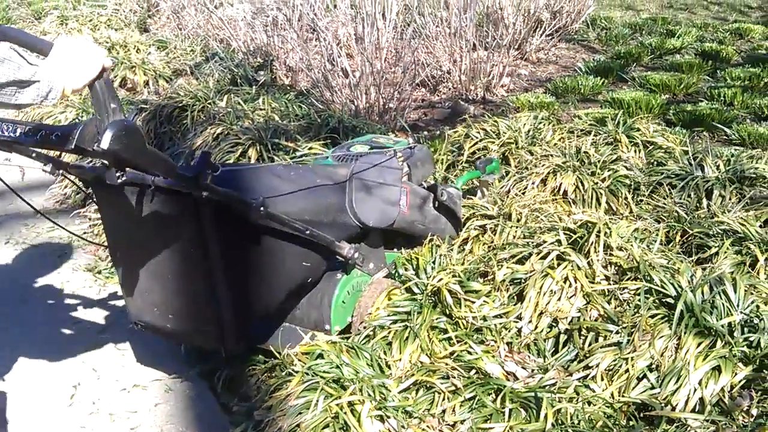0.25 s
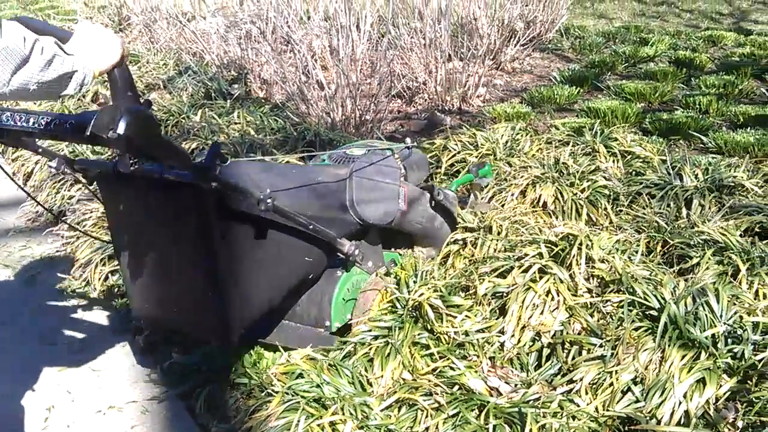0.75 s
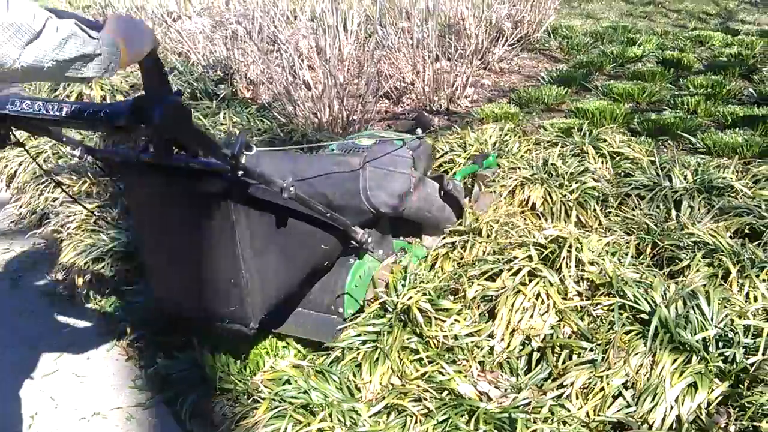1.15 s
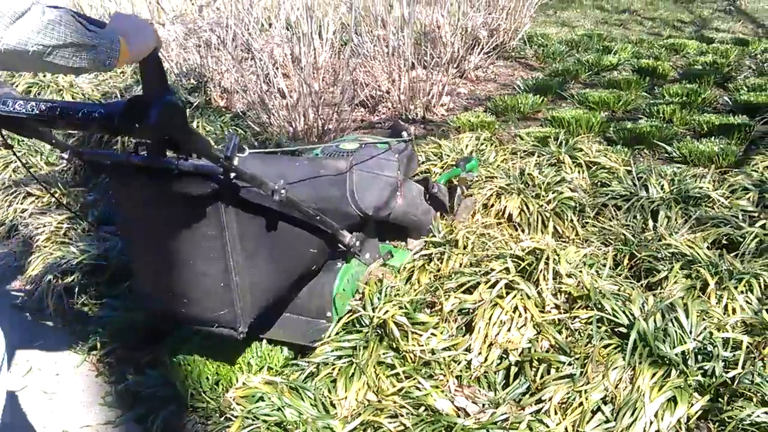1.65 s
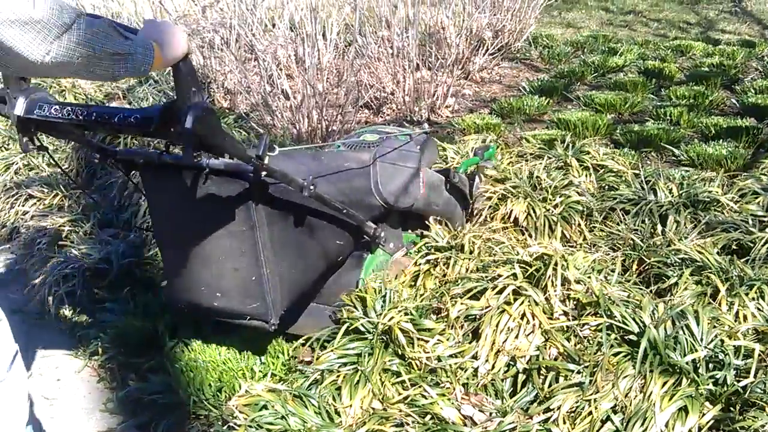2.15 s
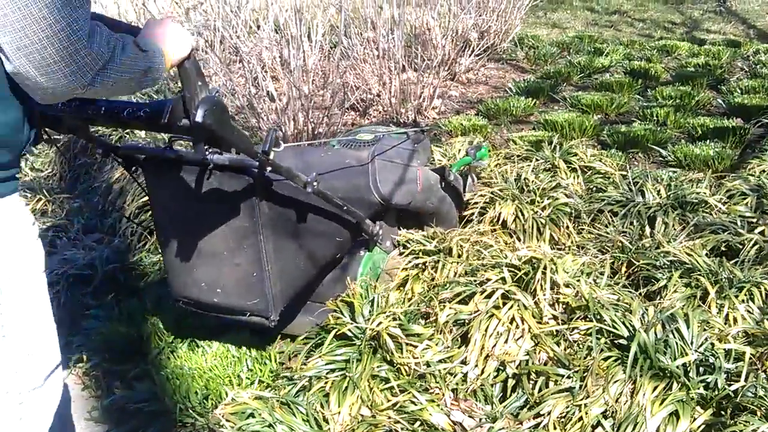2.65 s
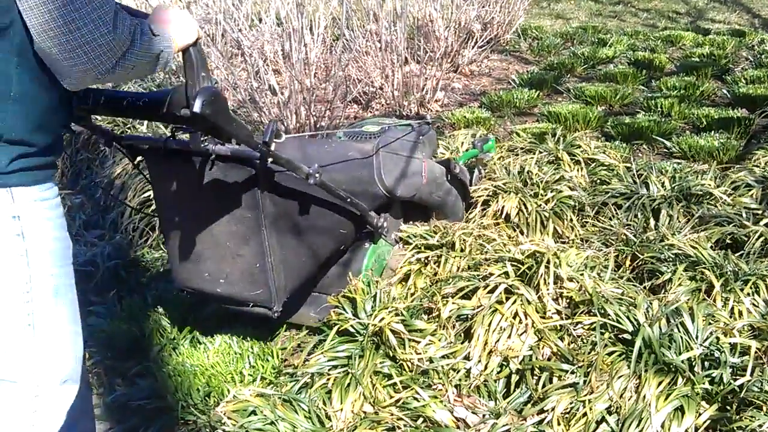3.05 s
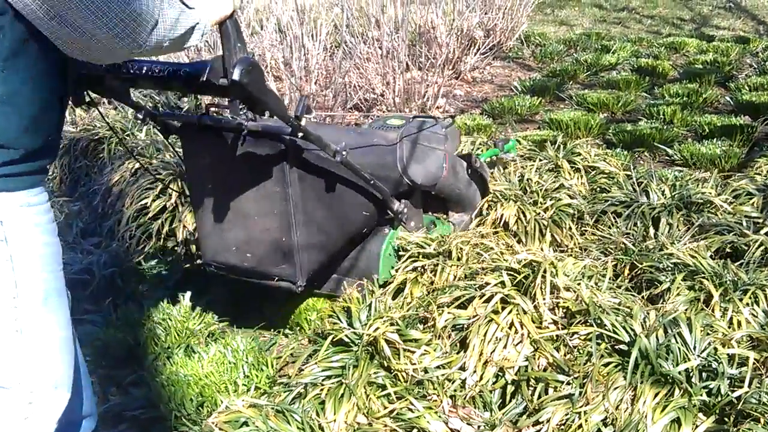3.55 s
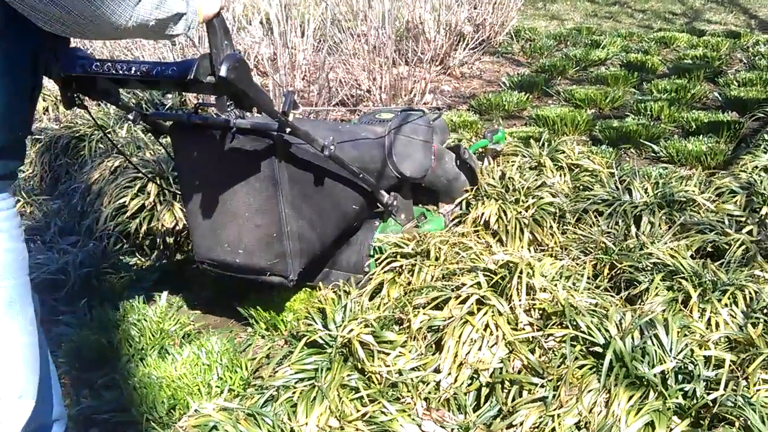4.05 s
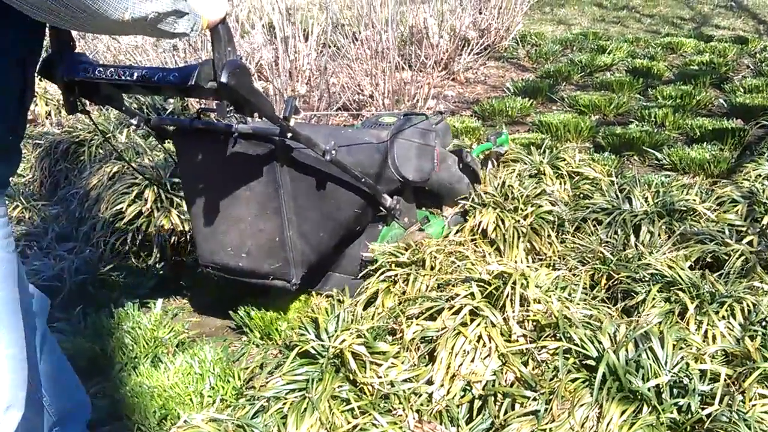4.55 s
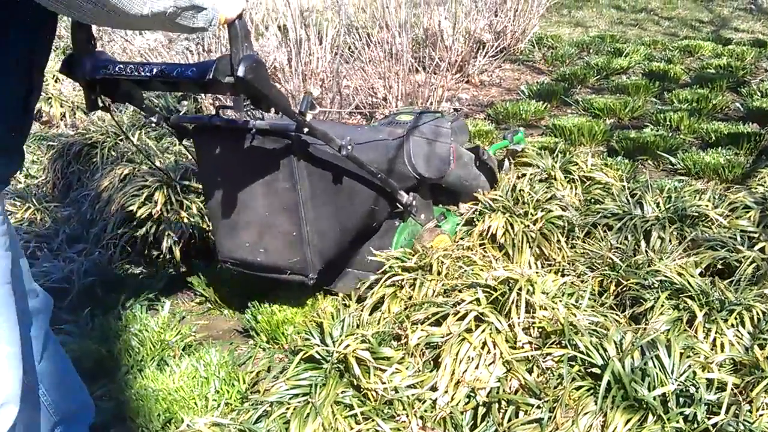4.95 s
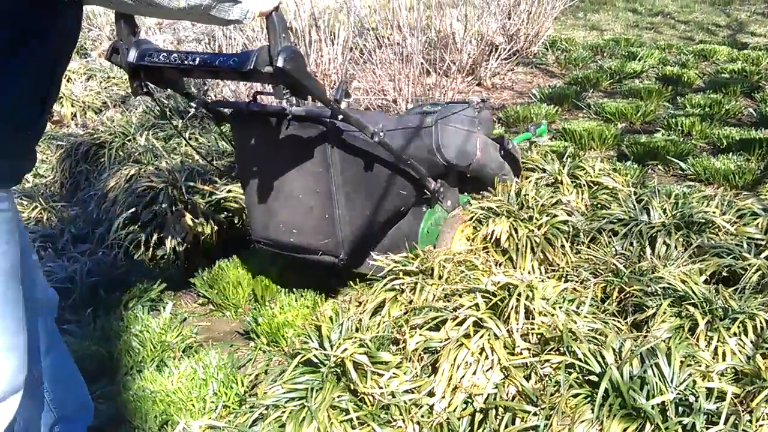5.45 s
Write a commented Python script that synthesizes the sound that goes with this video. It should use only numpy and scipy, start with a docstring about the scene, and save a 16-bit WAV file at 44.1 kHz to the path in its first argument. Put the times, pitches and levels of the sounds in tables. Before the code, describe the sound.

Close petrol mower engine running under load, wavering slightly in pitch as its blade roars and crunches through dense grass.

```python
"""Mowing long grass

A petrol mower is pushed through thick grass nearby. Its two-ended blade drones, drifting a little
in pitch, while the four-stroke engine fires every second turn. Air and clippings roar in the
deck (the steel shell over the blade), leaves shred with a pulsing hiss, and tough stalks snap."""
import sys
import numpy as np
from scipy import signal
from scipy.fft import rfft, irfft
from scipy.io import wavfile

SR = 44100
rng = np.random.default_rng(int(sys.argv[2]) if len(sys.argv) > 2 else 0)


def inscribe(sig):
    """Save sig as 16-bit PCM at rate SR to the path in sys.argv[1].

    A 1-D sig is mono; a 2-D sig holds one channel per row.
    Samples are clipped to [-1, 1] before scaling.
    """
    pcm = np.round(np.clip(np.atleast_2d(sig).T, -1, 1) * 32767)
    wavfile.write(sys.argv[1], SR, pcm.astype(np.int16))


N = 251811
T = np.arange(N) / SR
FREQS = np.maximum(np.arange(N // 2 + 1) * SR / N, 1)

# how often a blade end sweeps past, twice per turn: t/s, f/Hz
BLADE_RATE = [(0.0, 100.2), (0.1, 99.8), (0.19, 101.7), (1.04, 99.8), (1.32, 97.8), (1.52, 100.4),
              (2.07, 101.3), (2.2, 100.0), (2.77, 105.1), (2.96, 105.4), (3.44, 101.3), (3.81, 102.7),
              (4.15, 102.6), (4.45, 104.0), (4.69, 102.5), (5.19, 103.1), (5.5, 98.0), (5.7, 101.0)]
# the drone's main tones, at 2 and 3 times the blade rate: t/s, second level/dB, third level/dB
DRONE_LEVELS = [(0.0, -35, -46), (0.08, -34.5, -35.7), (0.37, -24, -31.5), (0.53, -24.5, -33),
                (0.74, -33, -38), (0.86, -34.5, -29), (0.96, -42, -31.5), (1.35, -31, -37.5),
                (1.47, -22, -25), (1.91, -23.5, -28.5), (2.1, -32.5, -37), (2.32, -40, -31),
                (2.41, -26, -25.5), (2.5, -42.5, -39.3), (2.6, -29, -26.5), (3.21, -21, -20.5),
                (3.53, -40, -30.5), (4.42, -22, -26.5), (4.95, -24.1, -30.5), (5.1, -21.7, -29),
                (5.25, -38, -40), (5.45, -45, -39), (5.52, -37.5, -42), (5.7, -37.5, -36)]
# how much grass the blade takes in, given as a loudness: t/s, level/dB
GRASS_LOAD = [(0.0, -32), (0.35, -26.5), (0.78, -28), (0.83, -26.5), (1.3, -29), (1.72, -26.5), (2.1, -30),
              (2.36, -29.5), (2.43, -25.5), (2.52, -32), (2.61, -24.6), (3.54, -24), (3.74, -27),
              (4.88, -29), (5.15, -26), (5.25, -31), (5.47, -33.5), (5.59, -29.5), (5.7, -26)]
# how each layer follows the mowing: usual level/dB, then dB per dB of load, second tone, third tone
RING_RULE = (-29.5, 0.83, 0.26, 0.32)
ROAR_RULE = (-28.5, 1.11, 0.05, 0.01)
HISS_RULE = (-30.5, 0.56, -0.07, -0.1147)
RASP_RULE = (-45.5, 1.7, -.5, -0.34)
# big clumps of leaves torn off by the blade: t/s, level/dB
CLUMPS = [(0.278, -23.5), (0.362, -23), (0.535, -25.5), (0.855, -19), (0.985, -26), (1.165, -29),
          (1.225, -30), (1.9, -23), (2.72, -31), (2.785, -20), (2.861, -23.5), (2.95, -23), (3.08, -24),
          (3.268, -20.5), (3.366, -23), (3.44, -22), (3.574, -19), (3.887, -27.5), (4.743, -26),
          (5.019, -23), (5.51, -32), (5.594, -26)]
# stalks hit by the blade: t/s, level/dB, extra level of the knock/dB
STALKS = [(0.155, -14.5, -23), (0.848, -17, 1), (1.181, -9.5, -10), (1.5638, -13, -25), (1.822, -10, -29),
          (1.921, -15, -24), (1.9702, -7, -10), (2.4374, -6.5, -1), (2.7285, -10.5, -0.5),
          (2.8617, -11, -17), (2.914, -11, -6), (3.1854, -10, 0), (3.36, -25, 0), (3.497, -15, 8),
          (5.072, -8, -20)]
# weaker tones of blade (whole numbers) and exhaust (quarters): multiple of blade rate, level/dB
OVERTONES = [(1, -29), (1.25, -32), (1.5, -33), (1.75, -25.5), (2.25, -33), (2.5, -33.5), (3.25, -24),
             (3.5, -23), (4, -24.5), (5, -23), (6, -19), (7, -17)]
# tones that the steel deck rings with: multiple of blade rate, level/dB
DECK_TONES = [(7.5, -13), (7.75, -19.5), (8.25, -15), (9, -12), (10, -25.5)]
# the tone colour of each noise, from low to high: f/Hz, level/dB
RUMBLE_COLOUR = [(25, -70), (45, -42), (70, -18), (100, -7), (145, -23), (185, -16), (260, 2.5),
                 (335, 16.5), (400, -17), (520, -30), (900, -45)]
DECK_COLOUR = [(40, -68), (250, -6), (400, -19.5), (500, -27.5), (620, -7.5), (740, -7.5), (830, 1),
               (930, -8), (1080, -18), (1500, -12), (3000, -42)]
ROAR_COLOUR = [(30, -60), (200, -53), (500, -1), (900, 2), (1180, -6.5), (1500, 4.5), (1850, 0.5),
               (2900, -2.5), (3500, -9), (4100, -6.5), (5400, -15.5), (6600, -14.5), (7500, -21),
               (14000, -38)]
HISS_COLOUR = [(100, -57), (1000, -32), (2200, -11.5), (4200, -14.5), (5400, -23), (6600, -15),
               (7500, -26.5), (8400, -16), (9500, -3.5), (10200, 0), (11200, -2.5), (12300, -10),
               (13300, -17), (14000, -34)]
RASP_COLOUR = [(1200, -30), (2700, -1.5), (4700, 1), (6500, -11.5), (7800, -23)]
KNOCK_COLOUR = [(25, -45), (70, -24), (200, -4), (500, -5), (1500, -10), (3700, 3), (5500, -23),
                (8000, -19), (12000, -14)]
# how sound reaches the two sides: f/Hz, left minus right level/dB, left lead/rad, likeness (0 to 1)
STEREO = [(110, 6, -0.4, 0.95), (185, 0.8, -0.05, .998), (270, 0, 0.1, .98), (311, -1.4, 1.08, .995),
          (466, 5, 2.6, 0.8), (660, 3.5, 3.5, 1), (847, -1.5, 4.5, 0.94), (1120, 8, 6, 0.73),
          (1550, -0.5, 6, 0.93), (1850, 8, 5, 0.75), (3000, 7.5, 6, 0.53), (3800, -0.5, 6.5, 0.65),
          (5270, 0, 7.5, 0.3), (6500, 7, 4.5, 0), (10100, 7.5, 7.5, 0.71), (13500, 11.5, 7, 0.3)]
# a short echo that lifts some pitches and weakens others: f/Hz, left strength, right strength
ECHO = [(310, 0, -0.11), (435, 0.062, 0.61), (697, 0.13, -0.068), (930, 0.16, -0.1), (1140, 0.012, 0.53),
        (1570, 0, 0.2), (2100, 0.45, -0.91), (3060, 0.15, -0.13), (3580, 0.16, 0.4), (4540, 0.85, -0.46),
        (6300, 0.42, -0.22)]

USUAL_DB = -28  # load and drone level at which a layer has its usual level
CLUMP_HALF_S, CLUMP_SURGE_DB = .019, 2.5  # half a crunch's length; most it lifts drone and deck
MODE_HZ, MODE_WIDTH_HZ = 844, 14  # the deck's sharpest resonance
SNAP_RISE_S, ECHO_S, TOP_HZ = .0012, .01, 13750
DIRECT = np.array([[1], [0]])  # pure tones go in the direct row only, not the scattered one


def undb(db):
    """Turn decibels into a gain."""
    return 10 ** (np.asarray(db) / 20)


def unit(x):
    """Scale a signal to an average strength (rms) of 1."""
    return x / np.sqrt(np.mean(x ** 2))


def over_time(table):
    """Spread each column of a time table over all samples."""
    times, *columns = np.transpose(table)
    return [np.interp(T, times, column) for column in columns]


def over_pitch(table):
    """Spread each column of a frequency table over all frequencies."""
    hz, *columns = np.transpose(table)
    return [np.interp(np.log(FREQS), np.log(np.sort(hz)), column) for column in columns]


def colour(x, spectrum):
    """Give x a tone colour and a strength of 1."""
    return unit(irfft(rfft(x) * undb(over_pitch(spectrum)[0]), N))


def noise():
    """Two rows of unrelated noise: the direct sound and its scattered part."""
    return rng.standard_normal((2, N))


def wander(rate_hz):
    """A smooth random wobble of strength 1, changing up to about rate_hz times a second."""
    return unit(irfft(rfft(rng.standard_normal(N)) / (1 + (FREQS / rate_hz) ** 4), N))


def dips(rate_hz, fall_s, recover_s):
    """Brief drops at random moments, scaled to strength 1."""
    moments = (rng.random(N) < rate_hz / SR) * 1.
    shape = (1 - np.exp(-T / fall_s)) * np.exp(-T / recover_s)
    drops = signal.fftconvolve(moments, shape)[:N]
    return -unit(drops - drops.mean())


def pulse(cycles, sharpness):
    """One swell in every cycle."""
    return unit(np.exp(sharpness * np.cos(2 * np.pi * cycles)))


def shaft_tones(passes, table, wobble_db):
    """Tones in step with the engine shaft, each wobbling in level by about wobble_db."""
    angle = 2 * np.pi * passes
    tones = (undb(db + wobble_db * wander(23)) * np.sin(multiple * angle + rng.uniform(0, 2 * np.pi))
             for multiple, db in table)
    return np.sqrt(2) * sum(tones)


def follow(rule, *levels_db):
    """A layer's level in dB as it moves with the load and the two drone tones."""
    base_db, *slopes = rule
    return base_db + sum(slope * (db - USUAL_DB) for slope, db in zip(slopes, levels_db))


def stereo(sound):
    """Direct and scattered sound reach left and right with their own level and timing."""
    direct, scattered = rfft(sound)
    pan_db, lead, likeness = over_pitch(STEREO)
    likeness = np.clip(likeness, 0, 1)
    left = direct * undb(pan_db)
    right = (likeness * direct + np.sqrt(1 - likeness ** 2) * scattered) * np.exp(-1j * lead)
    same_power = np.sqrt(2 / (1 + undb(pan_db) ** 2))
    return irfft(np.array([left, right]) * same_power, N)


def stalk_snaps():
    """Each tough stalk bursts in a few milliseconds of crackle and knocks the deck."""
    crackle, knock = np.zeros(N), np.zeros(N)
    for start, db, knock_db in STALKS:
        age = np.maximum(T - start, 0) / SNAP_RISE_S
        burst = undb(db) * age * np.exp(1 - age)
        crackle += undb(-6.5) * burst
        knock += undb(knock_db - 4.5) * burst
    return crackle * colour(noise(), HISS_COLOUR) + knock * colour(noise(), KNOCK_COLOUR)


def leaf_shredding(passes, hiss_db, rasp_db, drone_db):
    """Each blade end shreds a tuft of leaves with a hiss and a rasp."""
    sharpness = np.interp(drone_db, [-38, -26], [.42, .16])  # clearer strokes when the drone is weak
    tufts = undb(1.85 * wander(63) + 2 * wander(810))
    contact = passes + 0.08 * wander(40)  # each stroke lands a little early or late
    strokes = noise() * tufts * pulse(contact, sharpness)
    hiss = undb(hiss_db + 2) * colour(strokes, HISS_COLOUR)
    rasp = undb(rasp_db) * colour(strokes, RASP_COLOUR)
    return hiss + rasp


def deck_ring(passes, blade_hz, db):
    """Gusts and shaft tones ring the steel deck; it sings when 8 times the blade rate nears MODE_HZ."""
    gusts = colour(noise() * pulse(passes, sharpness=0.12), DECK_COLOUR)
    response = undb(3) / (1 + 2j * (8 * blade_hz - MODE_HZ) / MODE_WIDTH_HZ)
    singing = np.imag(response * np.exp(2j * np.pi * 8 * passes))
    ring = gusts + DIRECT * (singing + shaft_tones(passes, DECK_TONES, wobble_db=0))
    sharing = np.sqrt(1 + np.abs(response) ** 2 / 2)  # the singing takes its share of the energy
    return undb(db + 1.77 + 1.16 * wander(21)) * ring / sharing


def clump_swells():
    """One short swell in loudness for each big clump the blade tears off."""
    return sum(undb(db) * np.exp(-2 * ((T - middle) / CLUMP_HALF_S) ** 2) for middle, db in CLUMPS)


def air_roar(passes, db, crunches):
    """Swirling air and clippings pelt the deck, pulsing with the blade; torn clumps add crunches."""
    strength = np.hypot(undb(db + 1.02), crunches)
    pelting = undb(0.6 * wander(360) + 0.72 * wander(69))
    roar = colour(noise() * pelting * pulse(passes, sharpness=0.058), ROAR_COLOUR)
    rumble_db = np.interp(db, [-30, -22], [-24, -16])  # a heavier cut rumbles more
    rumble = undb(rumble_db) * colour(noise(), RUMBLE_COLOUR)
    return strength * (roar + rumble)


def blade_drone(passes, second_db, third_db):
    """The spinning blade hums over the throb of the exhaust and the air churning under the deck."""
    angle = 2 * np.pi * passes
    second = undb(second_db + 0.85 * wander(37)) * np.sin(2 * angle)
    third = undb(third_db + wander(20)) * np.sin(3 * angle)
    strength = np.hypot(undb(second_db), undb(third_db)) + undb(-37.5)
    tones = np.sqrt(2) * (second + third) + strength * shaft_tones(passes, OVERTONES, wobble_db=2.5)
    # churning grows mostly with the higher tone, as the deck fills with clippings
    churn = np.hypot(undb(second_db - 22), undb(third_db - 18)) * colour(noise(), RUMBLE_COLOUR)
    return DIRECT * tones + churn


def scene():
    """One shaft drives drone, ring, roar and hiss; they waver together while stalks snap on top."""
    blade_hz, = over_time(BLADE_RATE)
    passes = np.cumsum(blade_hz) / SR  # how many blade ends have swept past so far
    second_db, third_db = over_time(DRONE_LEVELS)
    load_db, = over_time(GRASS_LOAD)
    ring_db, roar_db, hiss_db, rasp_db = (follow(rule, load_db, second_db, third_db)
                                          for rule in (RING_RULE, ROAR_RULE, HISS_RULE, RASP_RULE))
    crunches = clump_swells()
    surge_db = CLUMP_SURGE_DB * np.minimum(crunches / undb(load_db), 1)
    waver = dips(rate_hz=45, fall_s=0.015, recover_s=0.01)
    drone = blade_drone(passes, second_db, third_db) * undb(surge_db + 1.87 * waver)
    ring = deck_ring(passes, blade_hz, ring_db + surge_db + 1.73 * waver)
    roar = air_roar(passes, roar_db + 1.7 * waver, crunches)
    hiss = leaf_shredding(passes, hiss_db, rasp_db, second_db) * undb(0.79 * waver)
    return stereo(drone + ring + roar + hiss + stalk_snaps())


def record(dry):
    """A short echo colours the sound, the tallest peaks are rounded, and the highest treble is cut."""
    ripple = 1 + np.array(over_pitch(ECHO)) * np.exp(-2j * np.pi * FREQS * ECHO_S)
    echoed = irfft(rfft(dry) * ripple, N)
    rounded = echoed / (1 + (echoed / .8) ** 6) ** (1 / 6)
    lowpass = signal.ellip(10, .2, 80, TOP_HZ, fs=SR, output="sos")
    return signal.sosfilt(lowpass, rounded)


dry = scene()
out = record(dry)
inscribe(out)
```